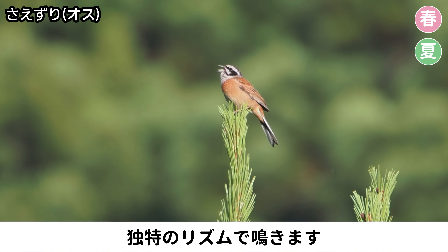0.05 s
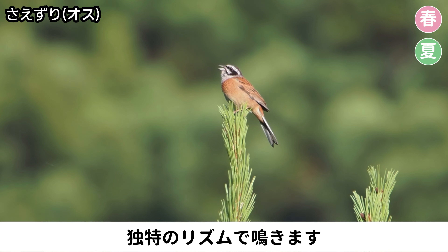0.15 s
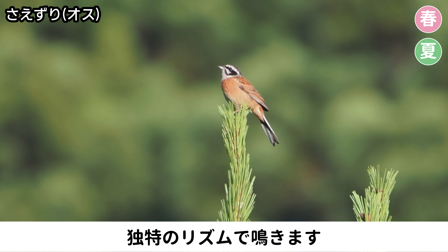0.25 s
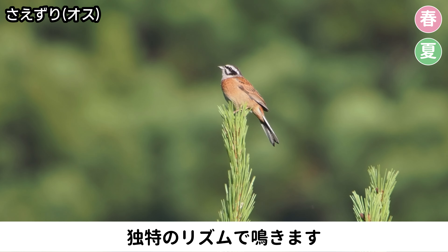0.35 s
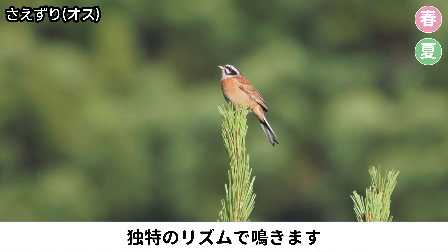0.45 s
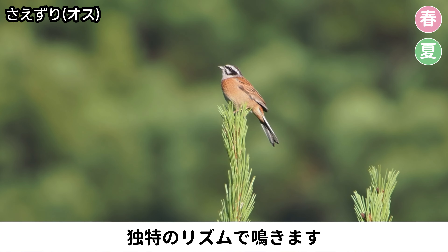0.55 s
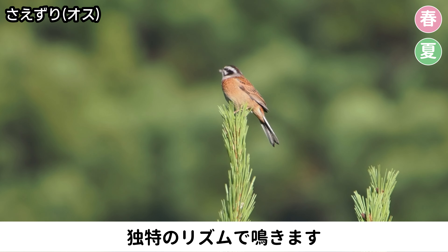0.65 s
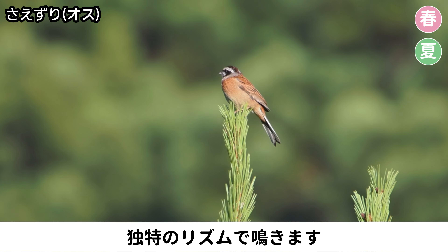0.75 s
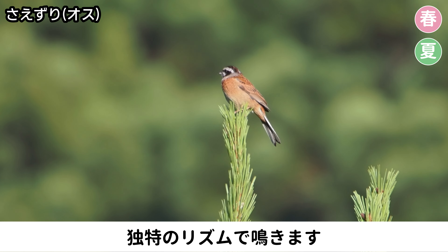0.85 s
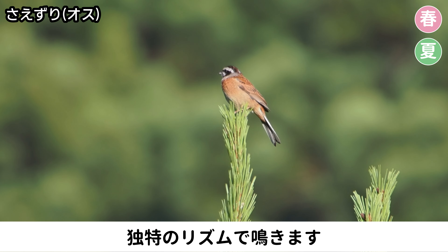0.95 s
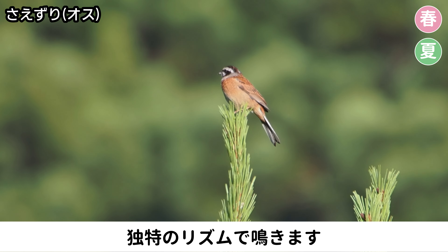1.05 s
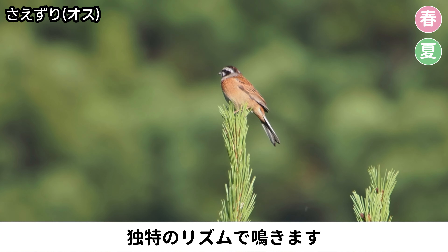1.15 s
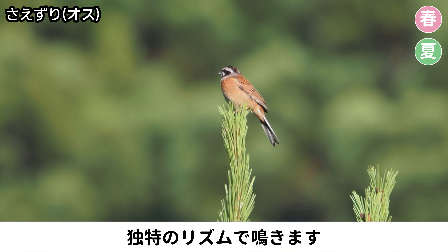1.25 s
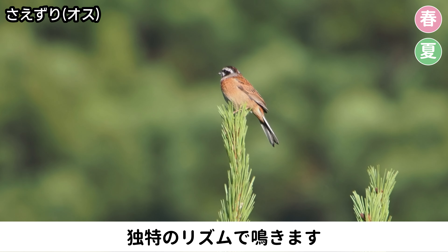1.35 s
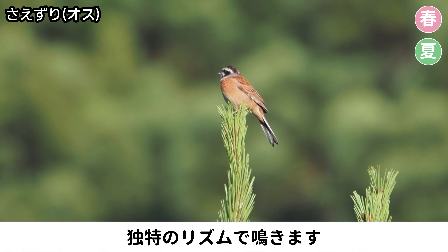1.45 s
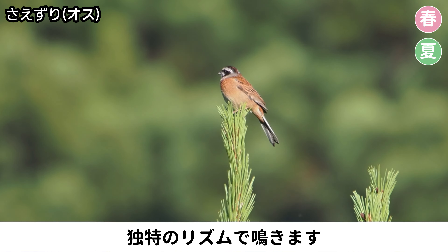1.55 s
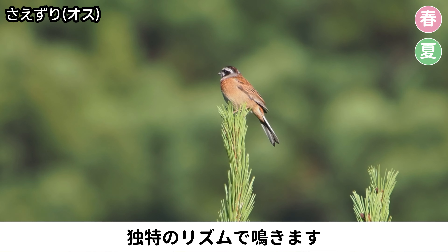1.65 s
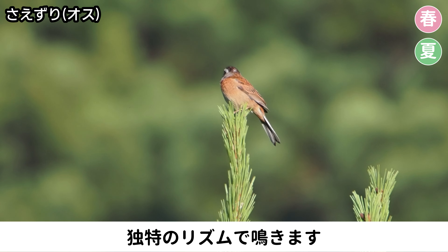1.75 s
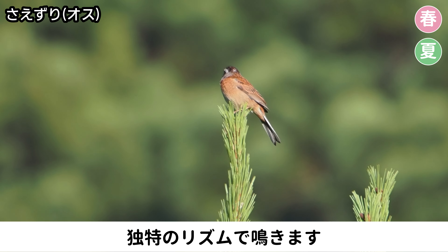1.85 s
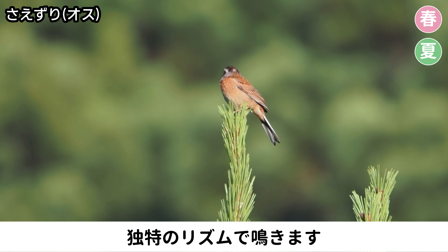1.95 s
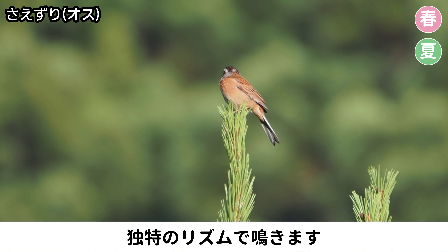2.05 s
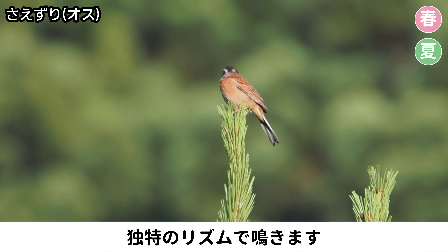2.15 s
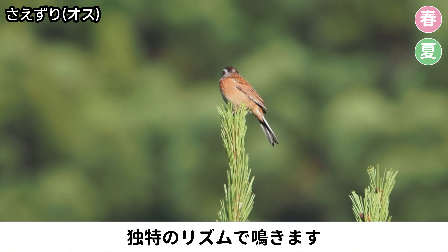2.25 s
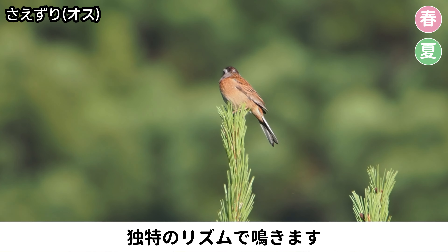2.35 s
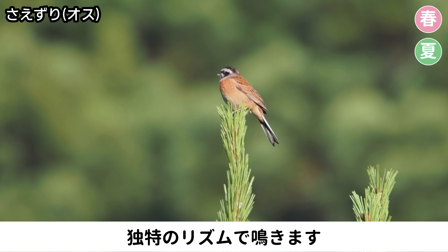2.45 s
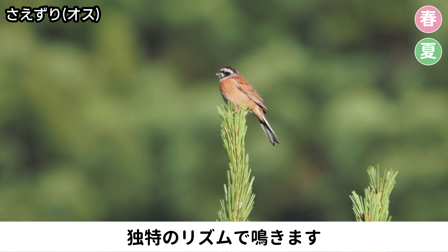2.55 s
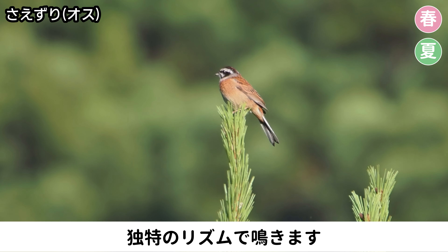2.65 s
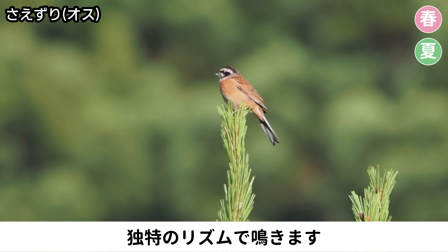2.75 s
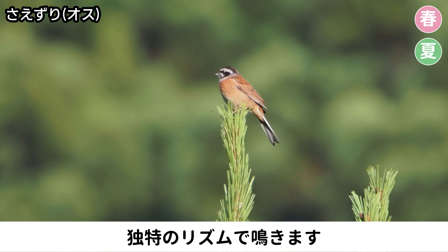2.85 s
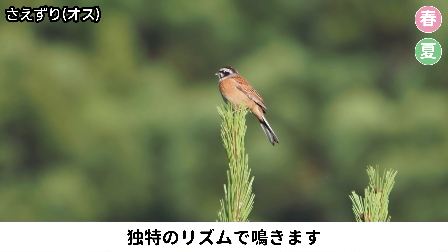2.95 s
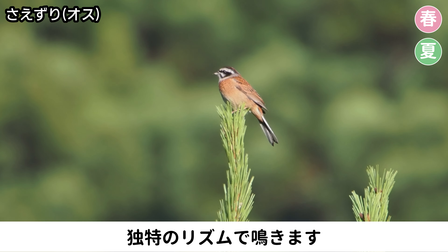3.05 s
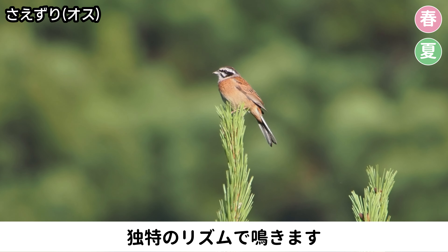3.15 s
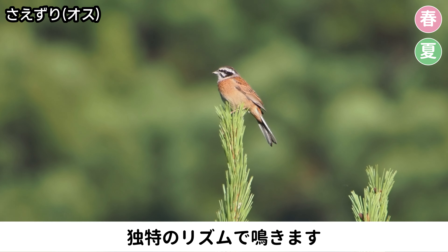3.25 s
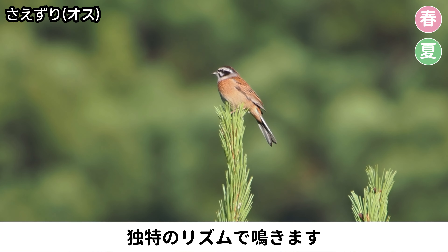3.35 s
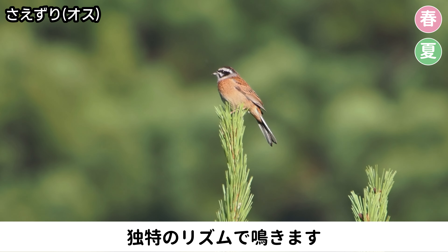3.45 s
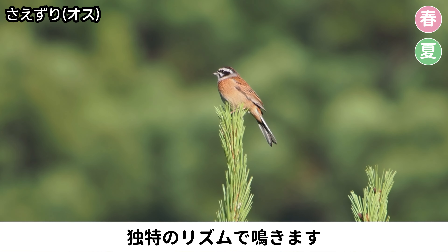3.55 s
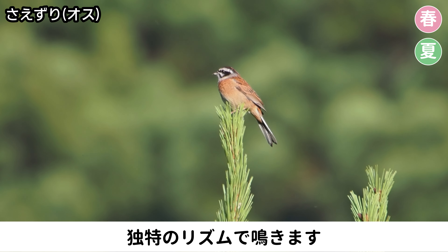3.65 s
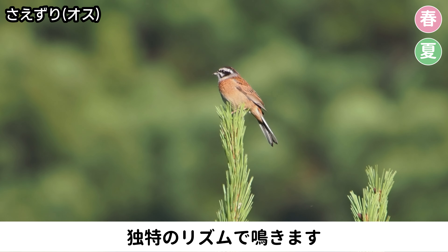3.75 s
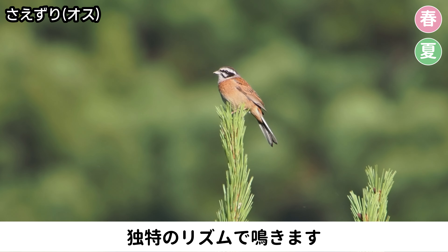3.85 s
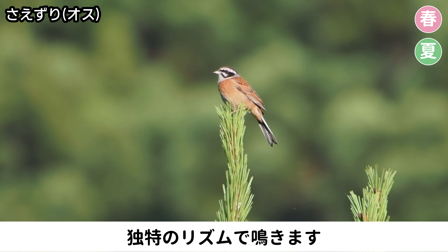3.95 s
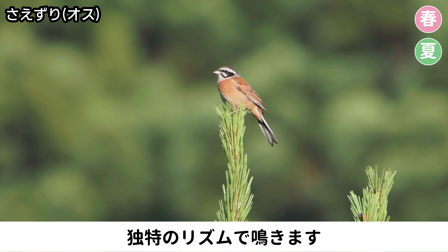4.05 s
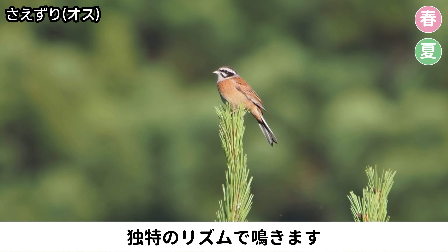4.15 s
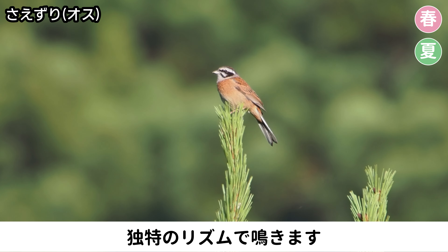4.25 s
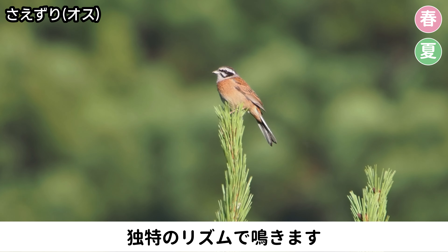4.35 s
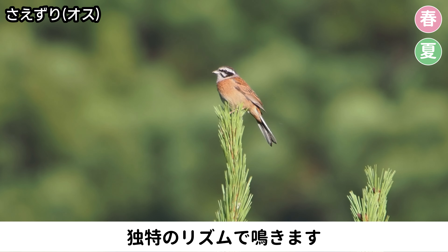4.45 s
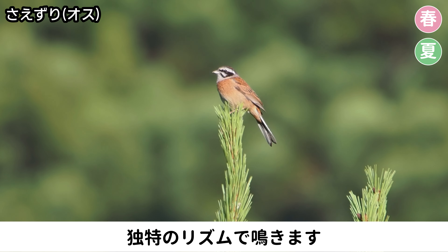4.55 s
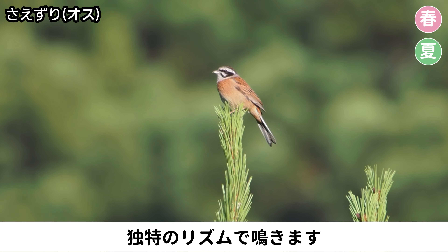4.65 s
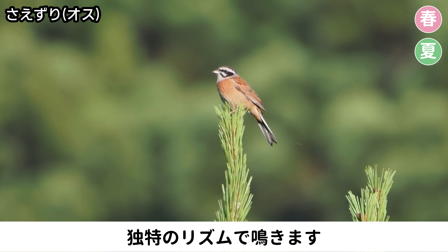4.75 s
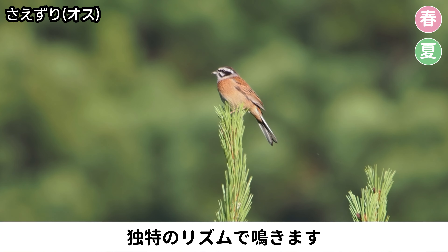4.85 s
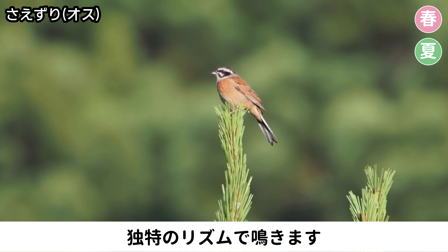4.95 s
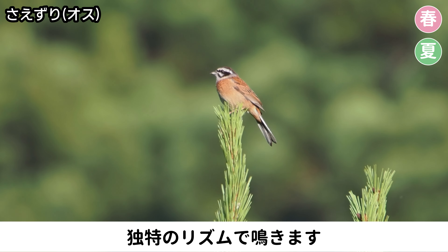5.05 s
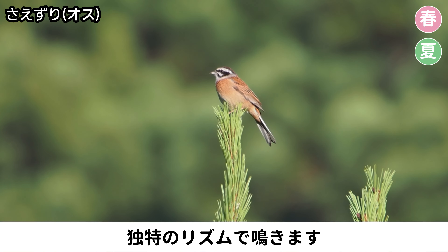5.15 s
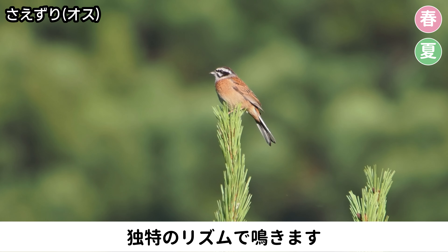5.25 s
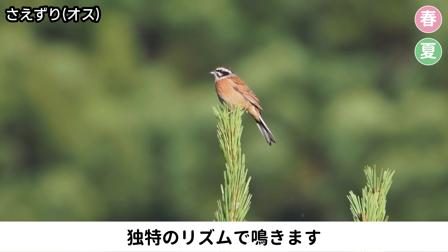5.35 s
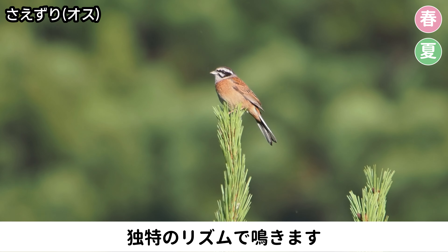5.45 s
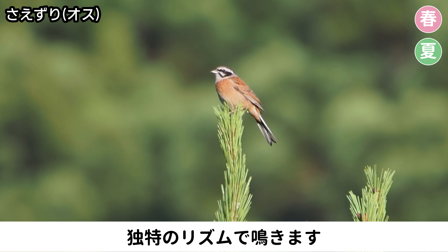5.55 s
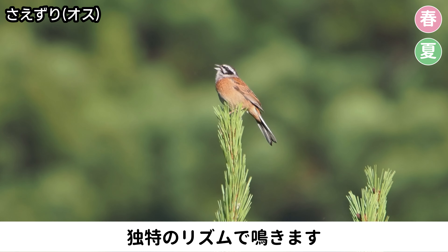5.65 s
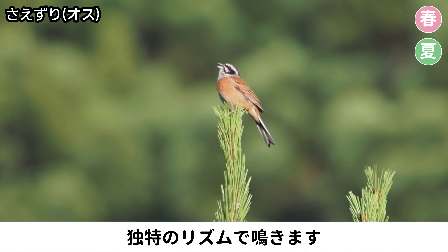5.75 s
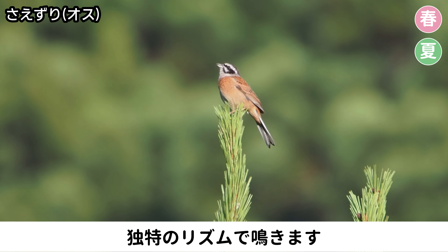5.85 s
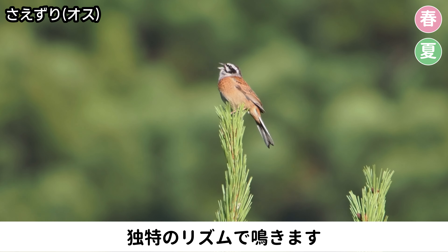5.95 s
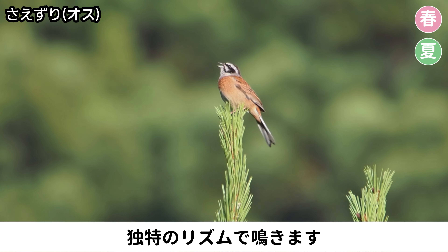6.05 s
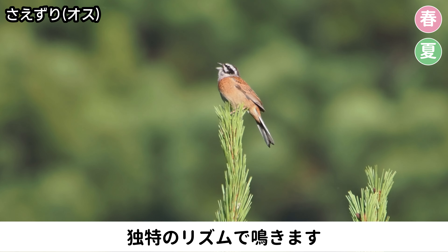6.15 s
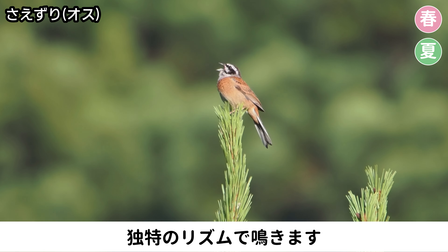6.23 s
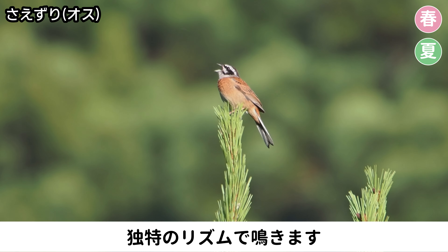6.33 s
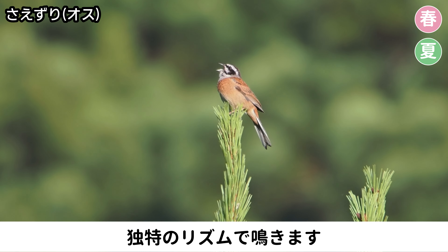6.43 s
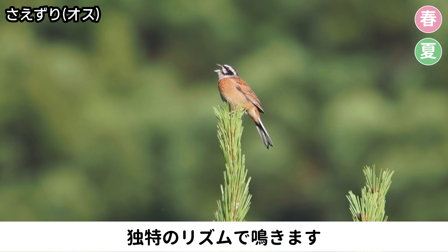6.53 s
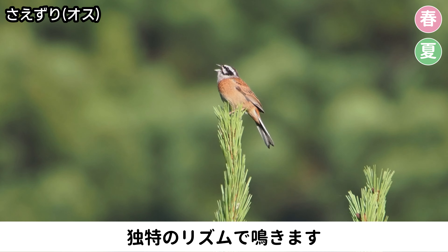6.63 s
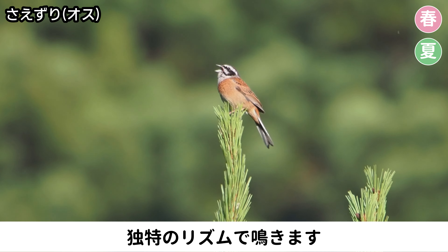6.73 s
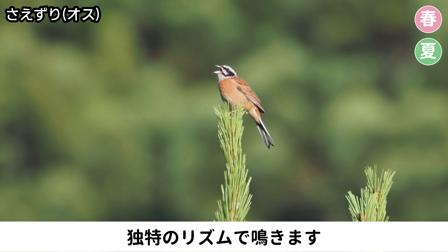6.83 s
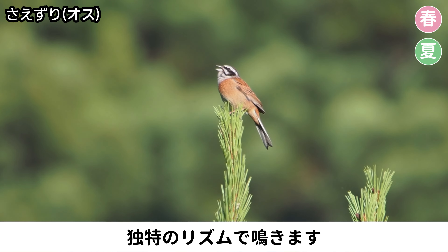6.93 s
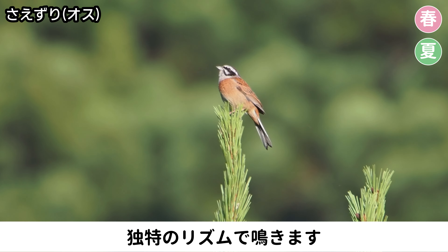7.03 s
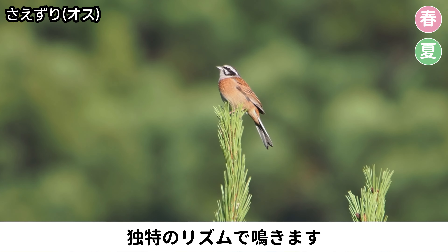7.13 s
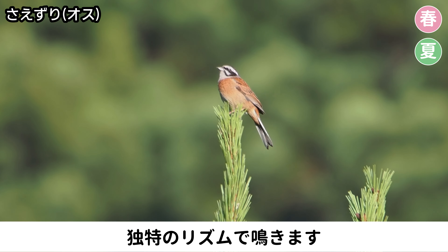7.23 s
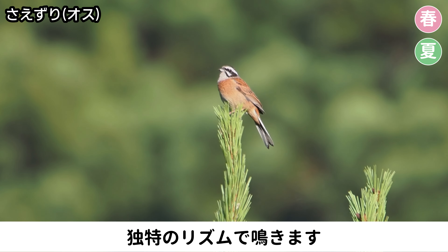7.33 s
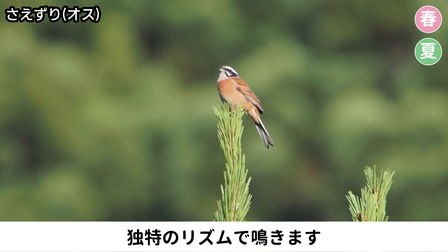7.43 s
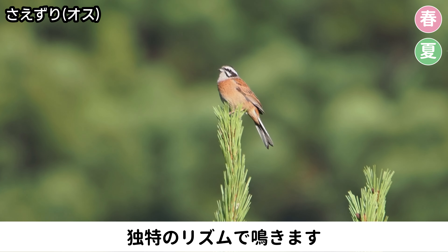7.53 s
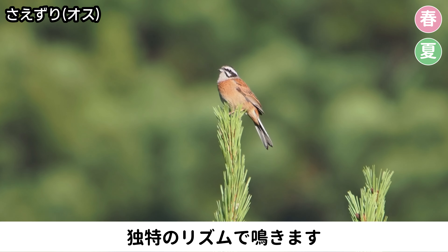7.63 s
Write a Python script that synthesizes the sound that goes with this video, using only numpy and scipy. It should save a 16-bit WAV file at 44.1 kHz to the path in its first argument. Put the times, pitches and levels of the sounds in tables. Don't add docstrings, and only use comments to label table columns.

```python
import sys
import numpy as np
from scipy import signal
from scipy.fft import rfft, irfft, next_fast_len
from scipy.io import wavfile
from scipy.ndimage import uniform_filter1d

SR = 44100
rng = np.random.default_rng(int(sys.argv[2]) if len(sys.argv) > 2 else 0)


def wrap_up_sound(samples):
    columns = np.atleast_2d(samples).T
    tamed = np.clip(columns, -1, 1)
    steps = np.round(tamed * 32767).astype(np.int16)
    wavfile.write(sys.argv[1], SR, steps)


def voltage_ratio(decibels):
    exponent = np.asarray(decibels, float) / 20
    return 10 ** exponent


N = 339129
LEAD = SR // 4


def walk(rate, size):
    hold = int(SR / rate)
    steps = np.repeat(rng.standard_normal(size // hold + 1), hold)
    return uniform_filter1d(uniform_filter1d(steps, hold), hold)[:size]


def curve(table, hz):
    known_hz, value = np.array(table).T
    return np.interp(np.log(hz), np.log(known_hz), value)


def add(track, note, unsteady_db=0.2, wobble=0, buzz=(), turn_s=.002):
    s, hz, db = np.transpose(note)
    i = np.arange(int(s[0] * SR), min(int(s[-1] * SR), N))
    t = i / SR
    pitch = uniform_filter1d(np.interp(t, s, hz), size=int(turn_s * SR), mode="nearest")
    pitch = pitch * (1 + wobble * walk(300, len(t)))
    for start, end, flutter_hz, swing_hz in buzz:
        buzzing = (t > start) & (t < end)
        pitch = pitch + swing_hz * np.sin(2 * np.pi * flutter_hz * (t - start)) * buzzing
    phase = 2 * np.pi * np.cumsum(pitch) / SR
    edge = np.clip(np.minimum(t - s[0], s[-1] - t) / 0.00054, 0, 1)
    level_db = np.interp(t, s, db) + unsteady_db * walk(235, len(t))
    track[i + LEAD] += np.sqrt(2) * voltage_ratio(level_db) * edge * np.sin(phase)


def chirps(rows, **how):
    track = np.zeros(N + LEAD)
    u = np.linspace(0, 1, num=9)
    swell_db = 5 * np.log10(np.sin(np.pi * u) + .08)
    for start, length, first_hz, mid_hz, last_hz, db in rows:
        bend = np.polyfit([0, .5, 1], [first_hz, mid_hz, last_hz], deg=2)
        add(track, np.c_[start + length * u, np.polyval(bend, u), db + swell_db], **how)
    return track


def slides(rows):
    return [(s, n, first, first + .58 * (last - first), last, db) for s, n, first, last, db in rows]


# t/s from its start, f/Hz, level/dB
HOOK = [(0, 4317, -41), (.005, 4220, -21), (.013, 4300, -18.5), (.016, 3885, -25), (.019, 3596, -43)]
SCOOP = [(0, 3682, -39), (.003, 3861, -29), (.012, 4060, -17), (.016, 4050, -20), (.019, 3580, -22),
         (.023, 3121, -44)]
SLIDE = [(0, 3150, -32), (.002, 3900, -19.5), (.0045, 5200, -26), (.006, 5560, -23), (.009, 4880, -21),
         (.021, 4720, -15.5), (.042, 3960, -16), (.05, 3750, -21), (.076, 3590, -26)]
SPLIT_LOW = [(0, 8200, -47), (.003, 8200, -35), (.008, 7700, -22), (.014, 7230, -22), (.018, 7100, -36)]
SPLIT_HIGH = [(.001, 9480, -46), (.008, 8670, -26), (.015, 7960, -29), (.021, 8200, -33), (.033, 7150, -19),
              (.035, 7020, -22), (.037, 7150, -35)]
CLIMB = [(0, 3650, -40), (.008, 3690, -25), (.024, 3880, -23), (.041, 4310, -13), (.067, 4700, -16),
         (.094, 5250, -18.5), (.103, 5330, -19), (.107, 3800, -21), (.11, 3440, -26)]
SETTLE = [(0, 3520, -27), (.004, 3480, -40)]
REBOUND = [(0, 3426, -28), (.002, 3695, -28), (.006, 4600, -16), (.01, 4880, -25)]
WAVE = [(0, 7050, -38), (.01, 7450, -27), (.022, 7570, -22), (.031, 7820, -19), (.041, 6780, -16.5),
        (.05, 7000, -17), (.063, 7520, -22), (.073, 6700, -17), (.081, 6680, -36)]
CHIP = [(0, 5450, -37), (.002, 4850, -20), (.005, 4640, -15.5), (.014, 4200, -16), (.018, 3950, -27)]
FIRST_CHIP = [(0, 5400, -40), (.002, 4680, -20), (.004, 4480, -17.5), (.012, 4260, -18.5),
              (.015, 4400, -28)]
VEE_LOW = [(0, 8850, -45), (.006, 8100, -33), (.0105, 7550, -28), (.014, 8000, -33), (.017, 8700, -32),
           (.021, 9200, -45)]
VEE_HIGH = [(.003, 9760, -42), (.007, 9340, -36), (.011, 9020, -31), (.014, 9280, -35), (.02, 10150, -54)]
DROP = [(0, 5150, -43), (.004, 5950, -31), (.008, 6230, -23), (.021, 6400, -18), (.029, 6130, -22),
        (.037, 4330, -26), (.042, 4080, -29)]
DRAWL = [(.042, 4080, -29), (.062, 4065, -22.5), (.098, 3950, -26.5), (.127, 3910, -30), (.137, 3900, -35),
         (.149, 3870, -37)]
SYLLABLES = {"hook": [HOOK], "scoop": [SCOOP], "slide": [SLIDE], "split": [SPLIT_LOW, SPLIT_HIGH],
             "climb": [CLIMB], "rebound": [REBOUND], "settle": [SETTLE], "wave": [WAVE],
             "short chip": [FIRST_CHIP], "chip": [CHIP], "vee": [VEE_LOW, VEE_HIGH],
             "close": [DROP, DRAWL]}
# syllable, start t/s, stretch of its length, pitch shift f/Hz, level/dB
PHRASES = [("wave", -.187, 1, 0, 0), ("short chip", -.069, 1, 0, 0), ("chip", -.0152, 1, 0, 0),
           ("chip", .038, 1.0, 30, -1), ("vee", .111, 1.02, -20, -1), ("close", .149, .99, -5, 0.1),
           ("hook", 5.783, 1, 0, 0), ("slide", 5.811, .99, 60, -1), ("scoop", 6.059, 1, 0, 0),
           ("slide", 6.091, 1.04, -50, .6), ("split", 6.24, 1.0, 10, 0.1), ("climb", 6.277, 1.0, 0, .6),
           ("rebound", 6.387, 1, 0, 0), ("split", 6.455, 1.0, -10, 0.1), ("climb", 6.496, .99, 10, -.6),
           ("settle", 6.604, 1, 0, 0), ("wave", 6.665, 1, 0, 0), ("short chip", 6.783, 1, 0, 0),
           ("chip", 6.835, 1.0, -40, 0.1), ("chip", 6.889, 1.0, 40, 0.1), ("vee", 6.96, 1.0, 20, .6),
           ("close", 6.998, 1.0, 5, 0.1)]
SLOW_TURNS_S = {"wave": .007, "vee": .004}
# centre f/Hz, width f/Hz, level/dB
OVERTONE = (10800, 900, -30)


def bunting():
    track = np.zeros(N + LEAD)
    centre_hz, width_hz, overtone_db = OVERTONE
    for name, start, stretch, shift_hz, level_db in PHRASES:
        # from s, to s, rate Hz, swing Hz
        buzz = [(start + .0035, start + .029, 225, 170)] if name == "close" else []
        for voice in SYLLABLES[name]:
            note = np.array(voice) * [stretch, 1, 1] + [start, shift_hz, level_db]
            add(track, note, unsteady_db=.4, buzz=buzz, turn_s=SLOW_TURNS_S.get(name, .002))
            s, hz, db = note.T
            off_resonance = (2 * hz - centre_hz) / width_hz
            add(track, np.c_[s, 2 * hz, db + overtone_db - 6 * off_resonance ** 2])
    return track


# start t/s, length t/s, first f/Hz, last f/Hz, level/dB
LEFT_BIRD = [(.815, 0.055, 3180, 3720, -40.5), (.865, 0.085, 3680, 3630, -42),
             (1.152, 0.06, 3450, 4400, -40), (1.2, .03, 4330, 4350, -41.5), (1.25, 0.045, 4350, 4130, -42),
             (1.24, .04, 3450, 3900, -47), (2.262, .072, 3280, 4450, -43), (2.842, .055, 4250, 4900, -42),
             (3.635, .06, 3500, 4520, -41), (4.168, 0.06, 3550, 4800, -45), (6.815, 0.077, 3100, 3720, -40),
             (7.205, 0.053, 3800, 4340, -38.5)]
# t/s from its start, length t/s, first, middle, last f/Hz, level/dB
RISE = [
    (0, .068, 4260, 4830, 5330, -.4),
    (.055, .05, 5180, 5550, 5880, -6.5),
    (.034, 0.046, 5250, 5780, 6250, -4.5),
    (.083, .028, 6230, 6000, 4900, -7.5),
]
# start t/s, level/dB
RISES = [
    (2.635, -39),
    (3.975, -40.5),
    (4.925, -41.5),
]
ARCH = [
    (0, .085, 4250, 4770, 4150, 0.1),
    (.066, .042, 4520, 3850, 2750, -1),
]
# start t/s, level/dB
ARCHES = [
    (1.495, -39),
    (7.538, -37.5),
]


def left_bird():
    calls = [np.array(part) + [start, 0, 0, 0, 0, db]
             for parts, times in ((RISE, RISES), (ARCH, ARCHES))
             for start, db in times
             for part in parts]
    return chirps(slides(LEFT_BIRD) + calls, unsteady_db=1.9, wobble=0.006)


# start t/s, length t/s, first f/Hz, last f/Hz, level/dB
RIGHT_BIRD = [(.445, 0.081, 3200, 3010, -43.5), (.545, 0.1, 5040, 4810, -46), (.56, .13, 7740, 7690, -56),
              (1.225, 0.065, 4750, 4830, -49), (5.13, 0.089, 4960, 4930, -50.5),
              (5.27, 0.035, 3140, 3650, -42), (1.045, .025, 4450, 4450, -49), (1.4, .07, 4780, 4850, -50),
              (1.655, .04, 4850, 4850, -47), (4.13, .03, 3520, 3560, -45), (4.585, .04, 2780, 2800, -44),
              (4.625, .045, 3380, 3600, -46), (4.72, .03, 1820, 1780, -43), (4.83, .05, 2450, 2400, -44),
              (5.175, .035, 1980, 2050, -43), (5.69, .04, 2620, 2660, -43), (5.885, .04, 2100, 2140, -40)]
# t/s, f/Hz, level/dB
CHATTER = [(2.778, 3000, -43), (2.873, 3720, -44), (2.903, 2900, -42), (2.955, 3550, -42),
           (2.955, 2460, -38), (3.033, 3570, -36), (3.1, 3500, -44), (3.168, 3520, -38), (3.2, 2300, -43),
           (4.27, 4250, -46), (4.805, 2750, -44), (5.085, 1750, -43)]


def right_bird():
    tick_s, fall = .016, .025
    ticks = [(s, tick_s, hz * (1 + fall), hz, hz * (1 - fall), db) for s, hz, db in CHATTER]
    return chirps(slides(RIGHT_BIRD) + ticks, unsteady_db=2.5, wobble=0.0092)


# start t/s, length t/s, mean fundamental f/Hz, level/dB, tilt/dB a multiple
FINCH = [(.84, .045, 1025, -62, -9), (1.03, 0.064, 985, -55.5, -3), (1.215, .1, 1060, -56, -2),
         (1.42, .12, 1068, -56.5, -4), (1.665, 0.079, 1069, -58.5, -7), (2.02, 0.044, 1030, -58, -2),
         (2.635, .065, 1067, -57.5, -6), (3.34, .045, 998, -56, -1), (3.67, .09, 1050, -55, 0),
         (4.127, .1, 1036, -55, -1.5), (4.538, 0.066, 1042, -54.5, -5.5), (4.953, .06, 1010, -54, -5),
         (5.17, .085, 1110, -60, -4), (5.43, 0.14, 1050, -59, -2), (5.918, 0.066, 1010, -56, -5),
         (6.127, .09, 1098, -56, -3), (7.617, .06, 1005, -59, -6)]
FINCH_ORDERS = (7, 8, 9)


def finch():
    rows = []
    for s, n, hz, db, tilt_db in FINCH:
        half_rise_hz = 420 * n / 2
        for k in FINCH_ORDERS:
            level_db = db + tilt_db * (k - 8) - 4 * (k % 2 == 0)
            rows.append((s, n, k * (hz - half_rise_hz), k * hz, k * (hz + half_rise_hz), level_db))
    return chirps(rows, unsteady_db=1.0, wobble=0.0094)


# start t/s, length t/s, f/Hz, level/dB
LOW_WHISTLE = [
    (4.47, .06, 855, -64),
    (4.62, 0.13, 862, -58),
    (4.78, .125, 860, -59),
    (4.95, .095, 863, -56.5),
    (5.08, .095, 880, -57),
    (5.23, .07, 874, -56),
]
# t/s, f/Hz, level/dB
WARBLER = [
    [(5.352, 3406, -49), (5.359, 2300, -34), (5.363, 2100, -27), (5.373, 2170, -31), (5.377, 2280, -22),
     (5.386, 2720, -18), (5.392, 2810, -23), (5.403, 2830, -30), (5.44, 2780, -34)],
    [(5.414, 1690, -42), (5.417, 1705, -31), (5.436, 1692, -27.5), (5.45, 1695, -33), (5.468, 1685, -34),
     (5.476, 1670, -50)],
]


def warbler():
    turn_up_hz = 30
    pieces = [(s, n, hz, hz, hz + turn_up_hz, db) for s, n, hz, db in LOW_WHISTLE]
    track = chirps(pieces, unsteady_db=.8)
    for note in WARBLER:
        add(track, note)
    return track


# t/s, f/Hz, level/dB
BURR = [
    (7.629, 3950, -39),
    (7.637, 4020, -31),
    (7.662, 3900, -32),
    (7.675, 3980, -29),
    (7.7, 4080, -29.5),
]


def burr():
    throb_hz, depth, swing_hz = 180, .45, 280
    track = np.zeros(N + LEAD)
    swell = (BURR[0][0], BURR[2][0], throb_hz, swing_hz)
    add(track, BURR, unsteady_db=0.0, wobble=.01, buzz=[swell])
    return track * (1 + depth * np.sin(2 * np.pi * throb_hz * np.arange(N + LEAD) / SR))


SEATS = {"bunting": (-11.5, 9, .1, .5), "left": (.5, 8, .11, -3), "right": (-3, 8, .09, 0),
         "finch": (-5, 8, .09, 0), "warbler": (-4, 9, .25, -10), "burr": (-6, 10, .09, 0)}
# delay t/s, left level/dB, right level/dB
ECHOES = [
    (.005, -21, -15),
    (.0105, -19, -23),
]
PAN_DB = {"bunting": [(3950, -1.6), (4500, 0), (6300, .8), (7300, .4)], "left": [(4000, 4.5)],
          "right": [(4000, -5)], "finch": [(8000, -8)], "warbler": [(1700, -3.5), (2100, -1), (2600, -2.2)],
          "burr": [(4000, -8)]}
LEAD_RAD = {"bunting": [(3900, .25), (4500, .33), (6300, .35), (7300, .08)], "warbler": [(1700, 0),
            (2600, -.32)], "burr": [(4000, -2.4)]}


def place(track, seat):
    wet_db, near_db, near_t60_s, side_db = SEATS[seat]
    t = np.arange(SR) / SR
    far_t60_s, leaf_hz, leaf_t60_s = 1.25, 6500, 2.2
    decay = voltage_ratio(-60 * t / far_t60_s) + voltage_ratio(near_db - 60 * t / near_t60_s)
    paths = rng.standard_normal((2, SR)) * decay * np.clip(t / 0.003, 0, 1)
    dull = signal.sosfilt(signal.butter(2, leaf_hz, fs=SR, output="sos"), paths)
    paths = dull + (paths - dull) * voltage_ratio(-60 * t / leaf_t60_s)
    ahead, sides = paths
    paths = ahead + voltage_ratio(side_db) * sides * np.array([[1], [-1]])
    paths *= voltage_ratio(wet_db) / np.sqrt(np.sum(paths ** 2, axis=1, keepdims=True))
    paths[:, 0] = 1
    for delay_s, left_db, right_db in ECHOES:
        paths[:, int(delay_s * SR)] += voltage_ratio(np.array([left_db, right_db]))
    heard = signal.fftconvolve(track[None], paths, axes=1)[:, LEAD:LEAD + N]
    size = next_fast_len(N)
    hz = np.arange(1, size // 2 + 2) * SR / size
    lead_rad = curve(LEAD_RAD.get(seat, [(1, 0)]), hz)
    left = voltage_ratio(curve(PAN_DB[seat], hz) / 2) * np.exp(.5j * lead_rad)
    return irfft(rfft(heard, size) * [left, 1 / left], size)[:, :N]


# f/Hz, side minus mid level/dB
WIDTH = [(60, -21), (110, -14.5), (200, -5.5), (380, -2.5), (700, -5), (1290, -7.5), (2380, -9),
         (4400, 0.5), (8120, 2.5), (15000, -2)]
# f/Hz, left minus right level/dB
LEAN = [(60, 0.0), (110, -1), (200, 0.5), (380, -1.5), (700, -3), (1290, -2.5), (2380, -1.5), (4400, -1.0),
        (8120, 0), (15000, 0.0)]


def floor(shape, level_db, swell_db, rate):
    hz = np.maximum(np.arange(N // 2 + 1) * SR / N, 1)
    mid, side = rfft(rng.standard_normal((2, N))) * voltage_ratio(curve(shape, hz))
    side = side * voltage_ratio(curve(WIDTH, hz))
    ears = np.array([mid + side, mid - side])
    lean = voltage_ratio(curve(LEAN, hz) / 2)
    noise = irfft(ears * [lean, 1 / lean], N)
    return noise * voltage_ratio(level_db + swell_db * walk(rate, N)) / np.std(noise.mean(axis=0))


# f/Hz, level/dB
RUMBLE = [(11, -38), (18, -5.5), (38, 3), (50, -2.5), (70, -9.5), (97, -5), (124, -15.5), (174, -12),
          (256, -29), (298, -17.5), (335, -21.5), (469, -25.5), (646, -18), (904, -20), (1000, -27.5),
          (1300, -41), (2200, -120)]
# t/s, level/dB of the lowest rumble
GUSTS = [
    (0.0, -53),
    (0.43, -55),
    (0.45, -49),
    (1.3, -57),
    (1.37, -47),
    (1.52, -54),
    (4.84, -50),
    (7.17, -52),
    (7.69, -54),
]


def wind():
    rumble = floor(RUMBLE, -49, swell_db=-0.2, rate=1.56)
    deep = signal.sosfiltfilt(signal.butter(2, 110, fs=SR, output="sos"), rumble)
    gust_db = np.interp(np.arange(N) / SR, *np.transpose(GUSTS))
    return rumble + deep * (voltage_ratio(gust_db - gust_db.mean()) - 1)


# f/Hz, level/dB
STREAM = [(590, -86), (1000, -21.5), (1240, -9), (1740, -1.8), (2390, -2.2), (2680, 0), (3190, -3),
          (4550, -5.5), (5280, -10.5), (7030, -14.5), (7620, -19), (10000, -19), (13500, -15),
          (15500, -16.5)]


def stream():
    return floor(STREAM, -37, swell_db=.15, rate=3)


def whine():
    hz, level_db = 14686, -75
    return np.sqrt(2) * voltage_ratio(level_db) * np.sin(2 * np.pi * hz * np.arange(N) / SR)


def scene():
    birds = {"bunting": bunting(), "left": left_bird(), "right": right_bird(),
             "finch": finch(), "warbler": warbler(), "burr": burr()}
    background = wind() + stream() + whine()
    return sum(place(track, seat) for seat, track in birds.items()) + background


def top_cut(x):
    return signal.sosfilt(signal.butter(12, 15670, fs=SR, output="sos"), x)


def record(dry):
    low_pass = signal.ellip(8, .1, 60, 15600, fs=SR, output="sos")
    mix = signal.sosfiltfilt(low_pass, dry)
    return top_cut(mix)


dry = scene()
out = record(dry)
wrap_up_sound(out)
```